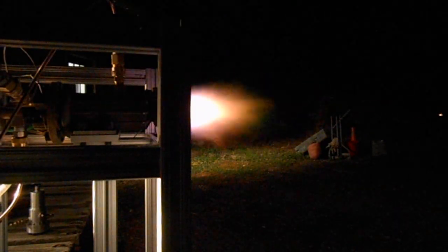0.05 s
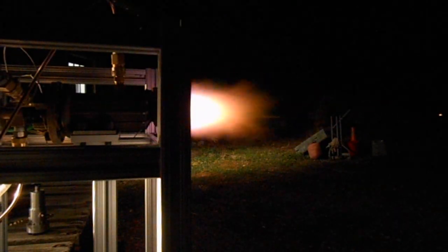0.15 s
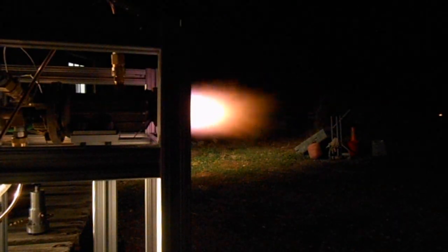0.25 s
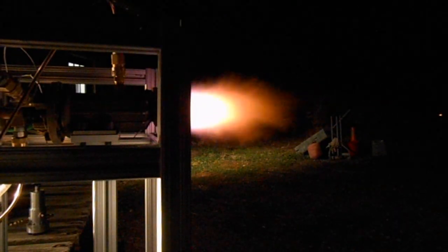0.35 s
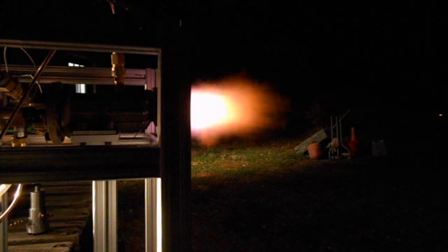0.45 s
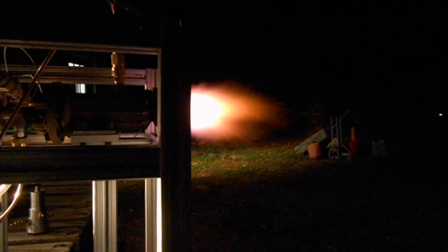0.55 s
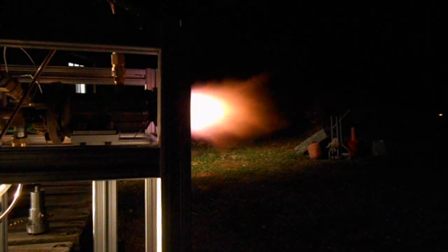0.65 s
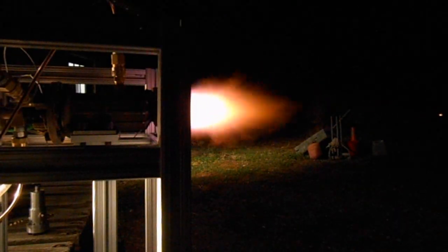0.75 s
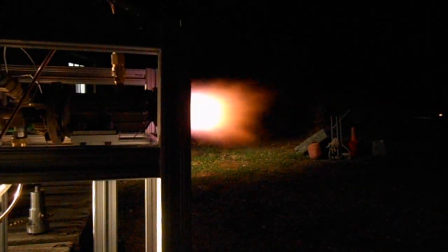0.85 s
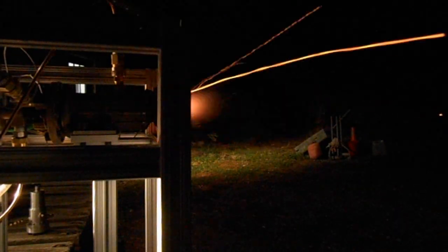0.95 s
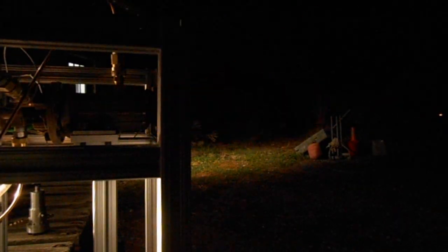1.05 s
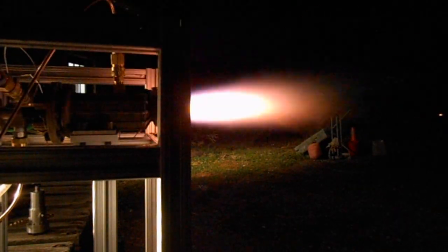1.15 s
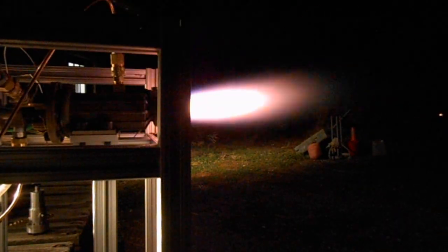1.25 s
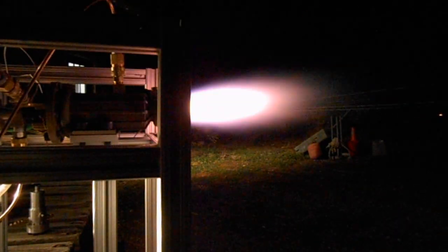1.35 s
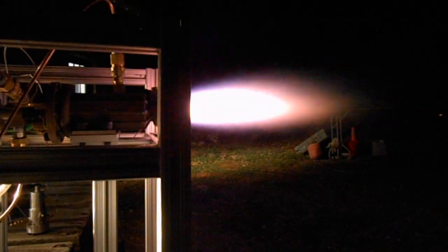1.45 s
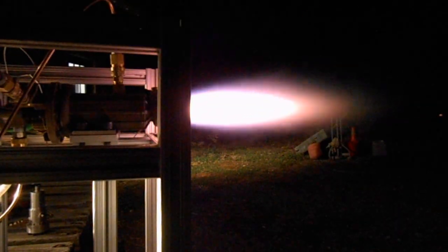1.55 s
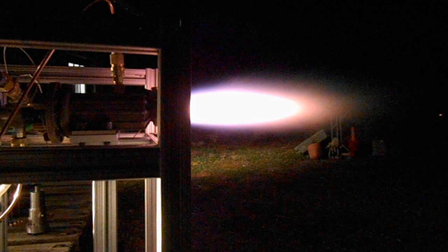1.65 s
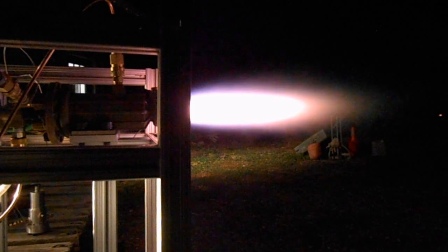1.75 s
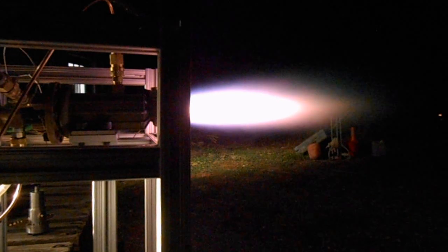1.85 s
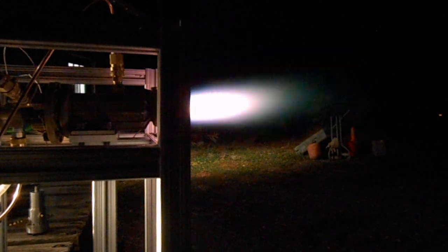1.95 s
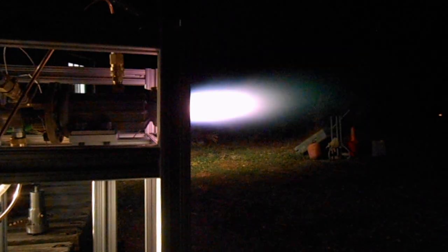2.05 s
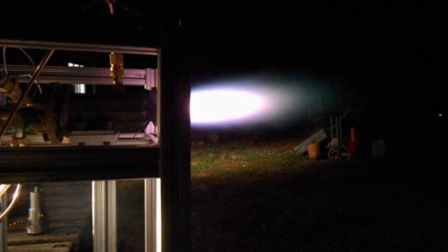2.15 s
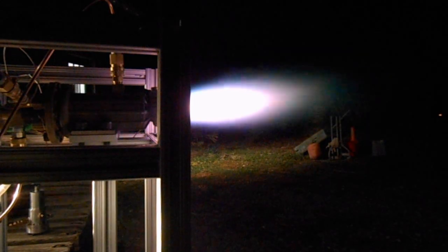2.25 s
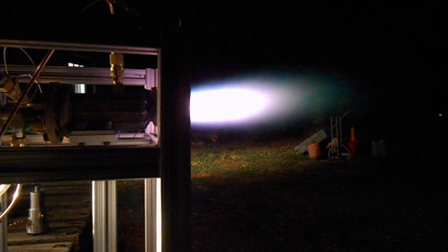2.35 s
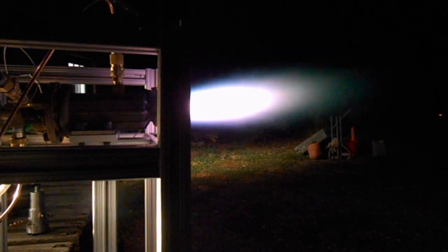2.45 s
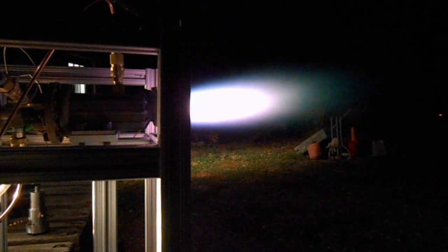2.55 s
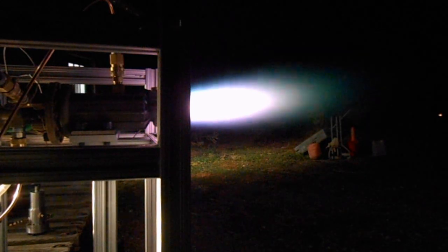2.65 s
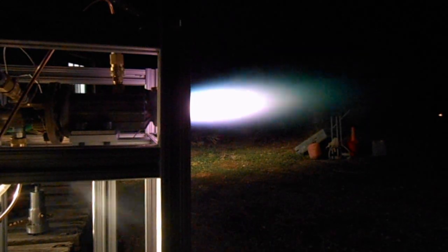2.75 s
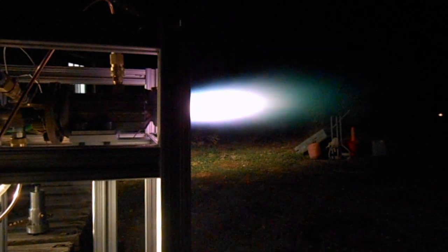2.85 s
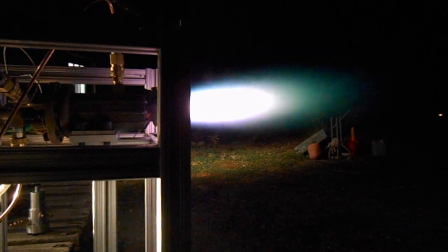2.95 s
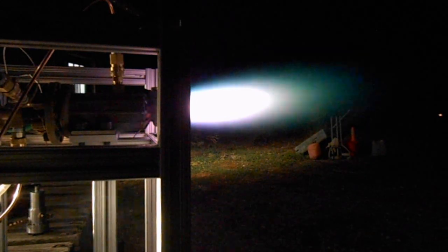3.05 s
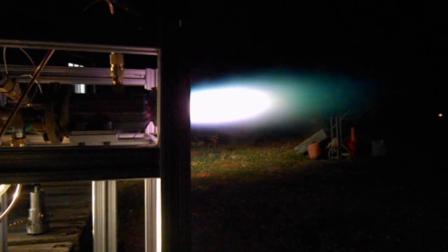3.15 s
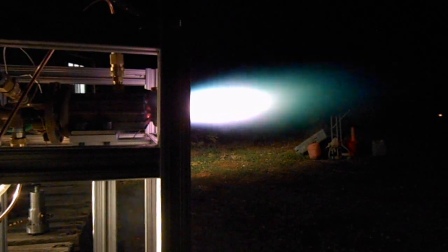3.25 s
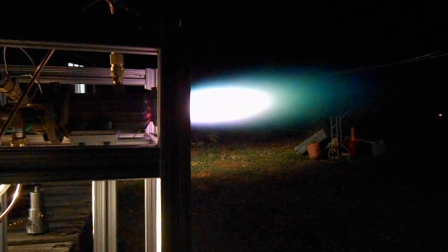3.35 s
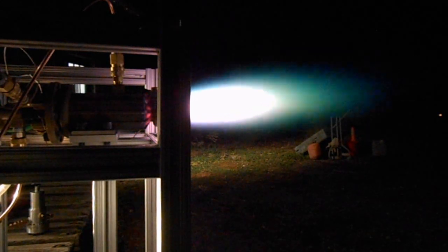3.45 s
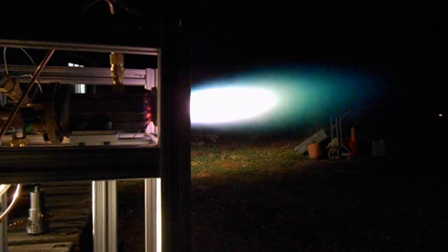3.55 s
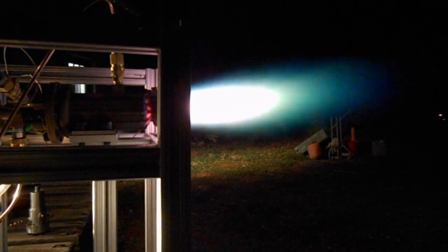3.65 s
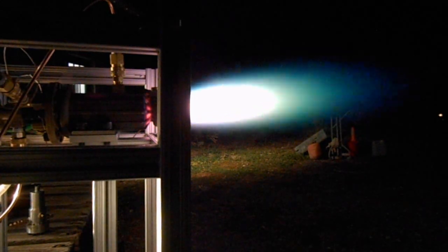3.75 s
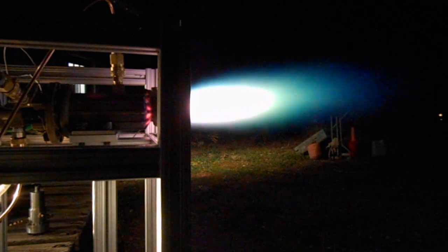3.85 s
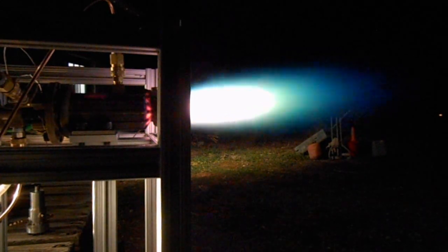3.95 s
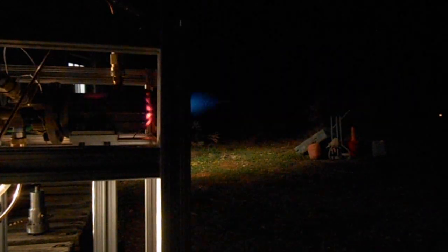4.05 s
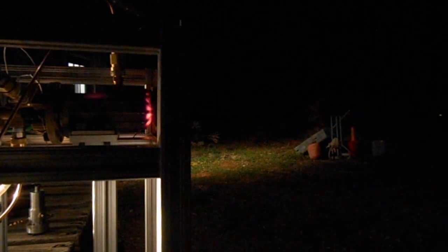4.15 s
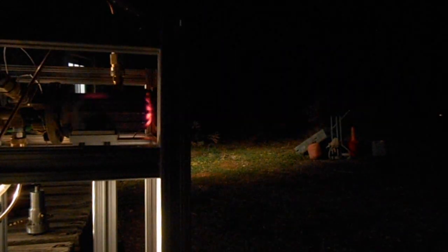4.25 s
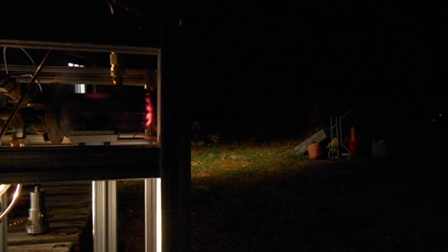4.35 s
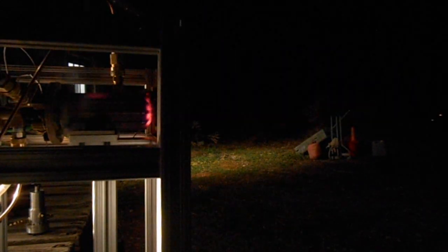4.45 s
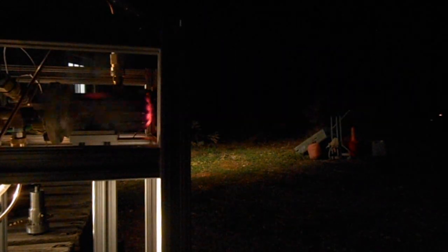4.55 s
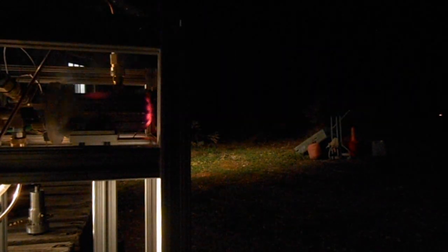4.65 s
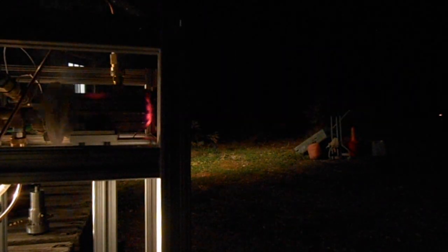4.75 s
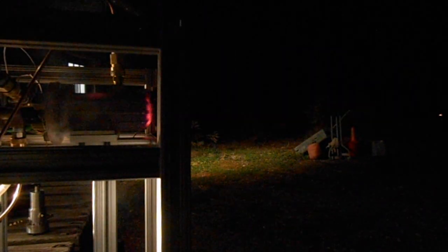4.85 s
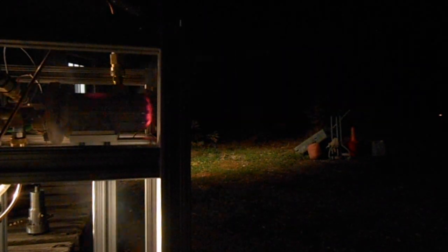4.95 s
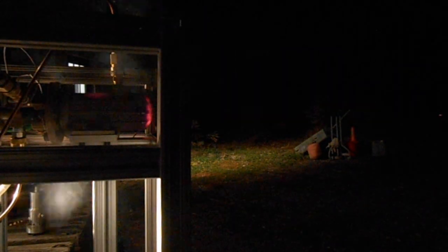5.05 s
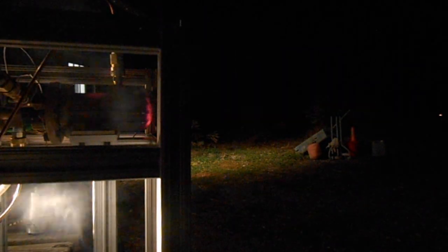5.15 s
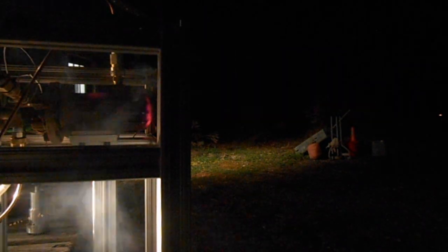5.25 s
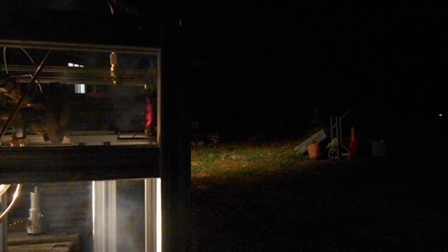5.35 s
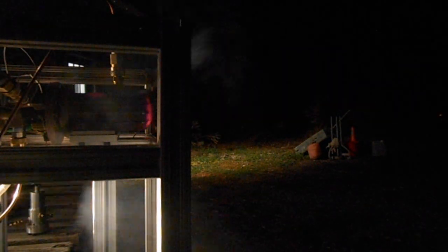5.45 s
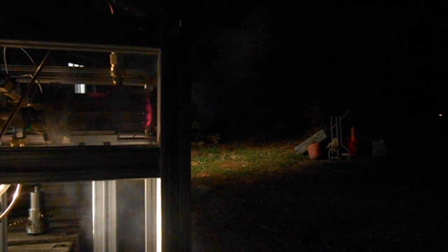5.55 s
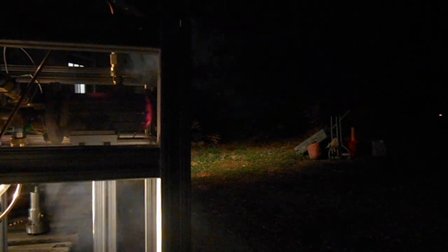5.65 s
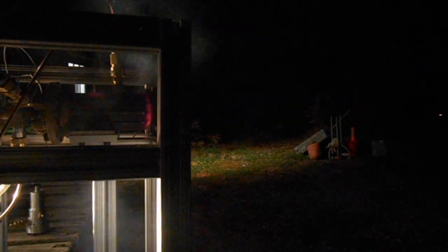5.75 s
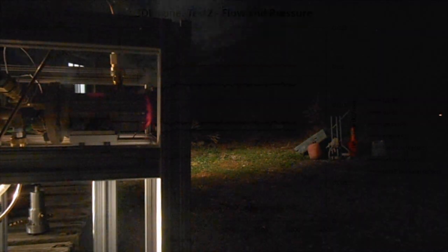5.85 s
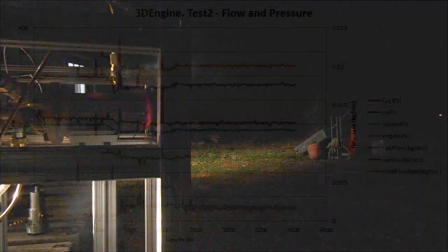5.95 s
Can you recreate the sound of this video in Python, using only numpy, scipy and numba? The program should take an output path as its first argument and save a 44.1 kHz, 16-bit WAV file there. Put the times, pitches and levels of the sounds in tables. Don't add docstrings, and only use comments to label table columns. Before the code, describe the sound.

An open-air engine test, nearly mono: a brief burst, a second of flapping burning, then three seconds of tearing, distorted roar and hiss. After an abrupt shut-off, escaping gas quickly weakens, its ringing dropping in pitch, with several small coughs. In the quiet that follows, an igniter rattles in quick buzzing bursts, gradually louder, while wind thumps the microphone.

```python
import sys
import numpy as np
from scipy import signal
from scipy.fft import rfft, irfft
from scipy.io import wavfile
from numba import njit

SR = 44100
rng = np.random.default_rng(int(sys.argv[2]) if len(sys.argv) > 2 else 0)


def nominal_scale(level):
    x = np.asarray(level, float) / 20
    return 10 ** x


def store_wav(level_fs):
    pcm = np.round(np.clip(np.atleast_2d(level_fs), -1, 1) * 32767)
    wavfile.write(sys.argv[1], SR, pcm.T.astype(np.int16))


N = 264600

DUMP_STARTS_S, GAS_ENDS_S = 4.12, 4.925
COOLING_POWER = 1.64


def unit(x):
    return x / np.sqrt(np.mean(x ** 2) + 1e-20)


def in_time(start, end):
    return np.clip((np.arange(N) / SR - start) / max(end - start, 1e-3), 0, 1)


def span(start, end, fade=0.048):
    t = np.arange(N) / SR
    return np.clip((t - start) / fade, 0, 1) * np.clip((end - t) / fade, 0, 1)


def settling(start, scale_s, power):
    return np.exp(-(np.maximum(np.arange(N) / SR - start, 0) / scale_s) ** power)


def drift(rate_hz):
    r = np.exp(-40 * np.pi * rate_hz / SR)
    chance = rng.standard_normal(N // 20 + 1002)
    slow = signal.lfilter([1], [1, -2 * r, r * r], chance)[1000:]
    return np.interp(np.arange(N) / 20, np.arange(len(slow)), unit(slow))


def band(x, low_hz, high_hz):
    return signal.sosfilt(signal.butter(3, [low_hz, high_hz], "band", fs=SR, output="sos"), x)


def turbulence(colour, edges, modes=()):
    hz = np.maximum(np.fft.rfftfreq(N, 1 / SR), 1)
    colour_hz, colour_db = np.array(colour).T
    level_db = np.interp(np.log(hz), np.log(colour_hz), colour_db)
    for centre, width, hump_db in modes:
        level_db += hump_db / (1 + (2 * (hz - centre) / width) ** 2)
    whole = rfft(rng.standard_normal(N)) * nominal_scale(level_db) * (hz > 12) * (hz < 16000)
    below = [0] + [.5 - .5 * np.tanh(11.7 * np.log(hz / edge)) for edge in edges] + [1]
    shares = [np.maximum(upper - lower, 0) for lower, upper in zip(below, below[1:])]
    return [unit(irfft(whole * np.sqrt(share), N)) for share in shares]


@njit
def gliding(x, hz, width, sr):
    y, r = np.zeros(len(x)), np.exp(-np.pi * width / sr)
    for i in range(2, len(x)):
        driven = (1 - r * r) / 2 * (x[i] - x[i - 2])
        y[i] = driven + 2 * r * np.cos(2 * np.pi * hz[i] / sr) * y[i - 1] - r * r * y[i - 2]
    return y


def gain_db():
    held_db, returns_s, scale_s, power = -37.5, 5.01, 0.36, 1.32
    return held_db * settling(returns_s, scale_s, power)


def night():
    # (frequency [Hz], level [dB per Hz])
    night_colour = [(150, -9.5), (500, 2), (900, 0), (1600, -8.5), (2150, 0), (2500, -19), (3400, -2.5),
                    (4200, -20.5), (6500, -14), (9200, -13.5), (15600, -26)]
    # (time [s], peak level [dB], pitch [Hz], minus = pull first)
    gust_knocks = [
        (4.996, -33.5, -110),
        (5.06, -33, 24),
        (5.204, -21.5, 68),
        (5.228, -26, -90),
        (5.361, -30, 58),
        (5.61, -40.5, 48),
        (5.722, -32, 70),
        (5.888, -27, 62),
        (5.923, -19, -82),
    ]
    gust_s, gust_db, gust_width_s = 5.17, 6, .13
    wind_db, wind_follows = -39.5, 0.2092
    far_db, far_follows = -33.5, 0.96
    preamp_db, preamp_follows = -59, .6
    echo_db, echo_fade_db_per_s = -55, 170
    t, gain = np.arange(N) / SR, gain_db()

    gust = gust_db * np.exp(-((t - gust_s) / gust_width_s) ** 2)
    wind = unit(band(rng.standard_normal(N), 12, 102)) * nominal_scale(wind_db + wind_follows * gain + gust)
    echo = nominal_scale(echo_db - echo_fade_db_per_s * np.maximum(t - GAS_ENDS_S, 0))
    far = turbulence(night_colour, [])[0] * (nominal_scale(far_db + far_follows * gain) + echo)
    far += nominal_scale(preamp_db + preamp_follows * gain) * rng.standard_normal(N)
    knocks = np.zeros(N)
    for start, peak_db, hz in gust_knocks:
        cycles = (t - start) * hz
        knocks -= nominal_scale(peak_db) * 1.2 * np.tanh(13.0 * cycles) * np.exp(-(2.06 * cycles) ** 2)
    return (wind + far) * span(4.9, 7, fade=0.05) + knocks


def igniter():
    # (time [s], length [ms])
    bursts = [(5.0075, 21.8), (5.0354, 38), (5.0784, 35), (5.1192, 24.1), (5.1521, 35), (5.1913, 33),
              (5.2305, 30.1), (5.2716, 27), (5.3066, 33.3), (5.3457, 5.2), (5.3556, 27), (5.3904, 33.2),
              (5.4333, 34.1), (5.4722, 23.7), (5.5056, 35.77), (5.5507, 35.3), (5.5995, 27.9), (5.6345, 28),
              (5.6716, 31.5), (5.7124, 29.7), (5.7497, 23), (5.7831, 30), (5.82, 33), (5.8662, 34),
              (5.9093, 36.14), (5.9562, 41.2), (5.267, 2.5), (5.591, 2.5), (5.857, 5)]
    # (low edge [Hz], high edge [Hz], level [dB], lag [ms], gain of a burst's first sparks [dB])
    spark_bands = [(477, 560, -49, -0.5, -1.5), (1963, 2250, -54.5, 2, 0), (2440, 2570, -64, 1, 0),
                   (2870, 3150, -50.5, 3.5, -9), (3330, 3650, -45.5, 1, -9), (3900, 4580, -53, 1.5, -1),
                   (4800, 5350, -40, 0.8184, 3.5), (5250, 6200, -42, 0.6, 11), (6300, 7060, -40, 1.5, 2.5),
                   (7280, 7680, -42.5, 1, -12.5), (7900, 8800, -45.5, 1, 9), (8800, 9400, -49, 0, 2),
                   (11800, 14700, -45.5, 4, -1), (14950, 15900, -50, 1.2, .7)]
    spark_hz, igniter_db, stray_db = 500.9, -21.5, -0.5
    late = slice(round(4.9 * SR), None)
    sparks, gate, young = np.zeros((3, N))
    heard_db = igniter_db + gain_db()
    for start, length_ms in bursts:
        level_db = heard_db[round(start * SR)] + stray_db * (length_ms < 6)
        luck = rng.standard_normal((40, 2))
        at = (start + np.arange(.2, length_ms / 1000 * spark_hz - .8) / spark_hz) * SR
        at = np.round(at + .35 * luck[:len(at), 0]).astype(int)
        at = at[at < N]
        sparks[at] = nominal_scale(level_db + 2.0 * np.minimum(luck[:len(at), 1], .6))
        gate[round(start * SR):round((start + length_ms / 1000) * SR)] = nominal_scale(level_db)
        sparks[at[:1]] *= .6
        young[at[:4]], young[at[4:7]] = .4, -.8
    ringing = np.zeros(N)
    for low_hz, high_hz, band_db, lag_ms, young_db in spark_bands:
        uneven = sparks * nominal_scale(young_db * young + 1.6 * drift(60))
        struck = np.roll(uneven, round(lag_ms * SR / 1000))[late]
        ringing[late] += nominal_scale(band_db) * unit(band(struck + 1e-18, low_hz, high_hz))
    fading = signal.lfilter([.025], [1, -.975], gate)
    air = rng.standard_normal(N)
    sizzle = nominal_scale(1.0) * unit(band(air, 4480, 7800))
    sizzle += nominal_scale(-4) * unit(band(air, 7900, 10000))
    sizzle += nominal_scale(-11.0) * unit(band(air, 11600, 16000))
    return ringing + nominal_scale(-10.5) * fading * sizzle


def purge_levels():
    # (time [s], level [dB])
    coughs = [
        (4.42, -0.5),
        (4.49, 2),
        (4.7, 2),
        (4.819, 3),
        (4.9, 1),
    ]
    cough_s, gas_fade_db_per_s = 0.026, 348.5
    purge_db = (-33.5, -36, -38.5, -51.5)
    dump_db, dump_s = (-16, 16, 23.5, 22), (0.3, 0.27, 0.27, 0.15)
    cough_share = (0.6244, 0.3353, 1.1, 2.4)
    t = np.arange(N) / SR
    cough = sum(db * np.exp(-((t - start) / cough_s) ** 2) for start, db in coughs)
    fade_db = gas_fade_db_per_s * np.maximum(t - GAS_ENDS_S, 0)
    return [level + dump * (1 - in_time(DUMP_STARTS_S, DUMP_STARTS_S + takes_s)) + share * cough - fade_db
            for level, dump, takes_s, share in zip(purge_db, dump_db, dump_s, cough_share)]


def purge():
    # (frequency [Hz], level [dB per Hz])
    purge_colour = [(20, -4.5), (60, -18), (370, -13.5), (1500, -15.5), (2200, -13.5), (3900, -15),
                    (4600, -27), (7000, -23), (9500, -16), (12200, -21.5), (14400, -28), (15000, -36),
                    (15800, -46)]
    # (first pitch [Hz], last pitch [Hz], time scale [s], width [Hz])
    modes_cooling = [(880, 610, 0.95, 247), (4170, 2850, 0.28, 300), (7340, 5500, 0.29, 330),
                     (9900, 8170, .3, 380), (12600, 14500, .6, 560)]
    chamber_upper_db = [-2.5, -.7, -7]
    patchy_db, patchy_hz = 1.3, 30
    late = slice(4 * SR, None)
    low_db, upper_db, hiss_db, rumble_db = [level[late] for level in purge_levels()]
    sputter = nominal_scale(1.8 * drift(55) + .6 * drift(12))[late]
    air = rng.standard_normal(len(sputter)) * sputter
    waver = (1 + .009 * drift(25))[late]
    modes = []
    for first, last, scale_s, width in modes_cooling:
        hz = (last + (first - last) * settling(DUMP_STARTS_S, scale_s, COOLING_POWER))[late] * waver
        ring = gliding(gliding(air, hz, width, SR), hz, width * 1.9, SR)
        modes.append(nominal_scale(patchy_db * drift(patchy_hz))[late] * unit(ring))
    upper = sum(nominal_scale(mode_db) * mode for mode_db, mode in zip(chamber_upper_db, modes[2:]))
    rumble, dull, bright = [layer[late] for layer in turbulence(purge_colour, [300, 4500])]
    sound = np.zeros(N)
    sound[late] = nominal_scale(low_db) * modes[0] + nominal_scale(upper_db) * modes[1]
    sound[late] += nominal_scale(hiss_db - 5.5) * upper * span(4.2, 7, fade=0.39)[late]
    rush = nominal_scale(upper_db - 4.5) * dull + nominal_scale(hiss_db - 5.5) * bright + nominal_scale(rumble_db) * rumble
    sound[late] += np.sqrt(sputter) * rush
    return sound * span(4.035, 7, fade=0.24) * span(0, 5.01)


def blast():
    # (centre [Hz], width [Hz], level [dB])
    blast_modes = [(455.2, 390, 13), (966, 425.6, 16), (4830, 560, 10), (9100, 1600, 9.5), (12600, 900, 6)]
    noise = turbulence([(20, -6.5), (12500, -2.5), (16000, -12)], [], blast_modes)[0]
    return nominal_scale(-11.5) * noise * span(-1, .17, fade=0.085)


def flame_levels():
    flame_db, surge_db, out_db = (-26.5, -21.5, -16), (9.5, 6, 5.5), (-24, -13, -3.5)
    surge = 1 - in_time(0.082, 0.18675)
    blown_out = in_time(0.9318, 1.2)
    return [a + b * surge + c * blown_out for a, b, c in zip(flame_db, surge_db, out_db)]


def flame():
    # (frequency [Hz], level [dB per Hz])
    flame_colour = [(20, 2), (150, -2), (500, -10), (1300, -14.5), (3900, -13), (4600, -17), (7200, -15.5),
                    (9300, -11.5), (10300, -14.5), (12300, -10), (14000, -20.5), (15700, -31)]
    # (centre [Hz], width [Hz], level [dB])
    flame_modes = [(937, 660, 6.5), (1845, 810, 8.5), (2540, 230, 4), (4000, 570, 3), (5010, 500, 7),
                   (5700, 300, 6.5), (8420, 270, 4), (9830, 1040, 9), (12300, 700, 2)]
    flap_db, flap_hz = 1, 11
    rumble, roar, hiss = turbulence(flame_colour, [300, 3000], flame_modes)
    rumble_db, roar_db, hiss_db = flame_levels()
    flutter = drift(25)
    sound = nominal_scale(rumble_db + flap_db * drift(flap_hz)) * rumble
    sound += nominal_scale(roar_db + 0.38 * flutter) * roar
    sound += nominal_scale(hiss_db + 0.46 * flutter + 1.2 * drift(110)) * hiss
    return sound * span(-1, 1.057, fade=.025)


def singing():
    start_s, end_s, glide_s = 1.03, 1.33, .06
    from_hz, to_hz, width_hz = 3000, 4170, 1100
    hz = to_hz + (from_hz - to_hz) * settling(start_s, glide_s, COOLING_POWER)
    air = gliding(gliding(rng.standard_normal(N), hz, width_hz, SR), hz, width_hz, SR)
    return nominal_scale(-24) * unit(air) * in_time(start_s - .02, start_s + 0.022) * span(0, end_s, fade=.1)


def jet_levels():
    jet_db, low_pressure_db = (-29, -21.5, -20.5, -12), (3, -5.5, -4, -7.5)
    rises_s, full_s = (0.98, 1.155, 0.5, 1.12), (1.6, 1.175, 1.25, 1.2281)
    shut_db, shut_takes_s = (-28, -4, -13.5, -16), (0.25, .04, 0.27, 0.17)
    slam_db = (2, -2.5, 0, -5)
    valve_shuts_s = 4.092
    slam = in_time(valve_shuts_s, valve_shuts_s + .03)
    levels = []
    for i in range(4):
        lacking = 1 - in_time(rises_s[i], full_s[i])
        drained = in_time(valve_shuts_s, valve_shuts_s + shut_takes_s[i])
        levels.append(jet_db[i] + low_pressure_db[i] * lacking + shut_db[i] * drained + slam_db[i] * slam)
    return levels


def jet():
    # (frequency [Hz], level [dB per Hz])
    jet_colour = [(20, 1), (180, -6.5), (600, -4), (2700, -4.5), (3900, 2), (5200, -5.5), (6800, -5.5),
                  (8600, -2.5), (10200, -1), (12000, -4), (13500, -9), (15700, -18)]
    layers = turbulence(jet_colour, [300, 2500, 5000])
    sound = sum(nominal_scale(level_db + 0.46 * drift(25)) * layer for level_db, layer in zip(jet_levels(), layers))
    thin = signal.sosfilt(signal.butter(2, 700, "high", fs=SR, output="sos"), sound)
    running = span(-1, 4.22, fade=0.067)
    since = np.maximum(np.arange(N) / SR - 4.09, 0)
    sag = nominal_scale(-13.5) * np.tanh(since / .03) * (1 - since / .145) * np.exp(-since / 0.12482)
    lit = span(1.032, 7, fade=.025) * span(0, 4.508, fade=0.32)
    return nominal_scale(-0.14) * (running * sound + (1 - running) * thin) * lit + sag


def scene():
    mix = night() + igniter() + purge() + blast() + flame() + singing() + jet()
    return np.tile(mix, (2, 1))


def top_cut(x):
    return signal.sosfilt(signal.butter(12, 15830, fs=SR, output="sos"), x)


def record(dry):
    # (time [s], low edge [Hz], high edge [Hz], side level under mid [dB])
    splits = [(1.359, 5640, 7700, -3), (1.359, 10900, 12300, -2), (1.636, 4600, 5700, -3),
              (2.242, 10200, 11800, -5), (2.242, 14400, 15800, -3), (2.406, 5685, 8226, -4),
              (3.773, 11600, 13200, -2), (4.031, 6840, 8950, -4), (4.075, 10380, 13900, -4),
              (4.075, 14500, 15800, -3), (4.284, 4200, 5800, -9.5), (4.284, 10200, 11700, -12),
              (5.818, 4600, 8200, -25), (5.818, 8400, 10400, -25), (5.818, 13800, 15800, -18)]
    ceiling = (.66, .36, .73)
    # begins, full, eases, gone [s]
    squeezed_s = (.11, .19, 1.13, 1.3)
    x = dry[0]
    notched = signal.lfilter(*signal.iirnotch(11050, 6.5, fs=SR), x)
    x = 0.21 * x + 0.85 * notched
    x = x - .08 * signal.sosfilt(signal.butter(2, 15, "high", fs=SR, output="sos"), x * x)
    squeezed = in_time(*squeezed_s[:2]) - in_time(*squeezed_s[2:])
    top = np.where(x > 0, ceiling[0] + (ceiling[1] - ceiling[0]) * squeezed, ceiling[2])
    x = x / (1 + np.abs(x / top) ** 5) ** (1 / 5)
    x = signal.sosfilt(signal.cheby2(14, 50, 16400, fs=SR, output="sos"), x)
    side = np.zeros(N)
    for centre, low_hz, high_hz, side_db in splits:
        at = slice(round((centre - .024) * SR), round((centre + .024) * SR))
        noise = band(band(rng.standard_normal(4096), low_hz, high_hz), low_hz, high_hz)
        noise = unit(noise[-len(x[at]):])
        level = np.std(band(x[at], low_hz, high_hz))
        side[at] += nominal_scale(side_db) * level * noise * np.hanning(len(noise))
    return top_cut(np.array([x + side, x - side]))


dry = scene()
out = record(dry)
store_wav(out)
```